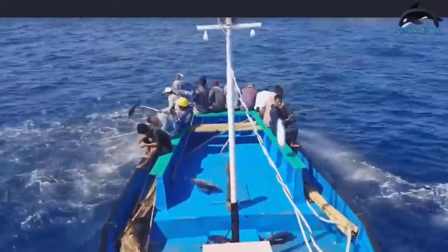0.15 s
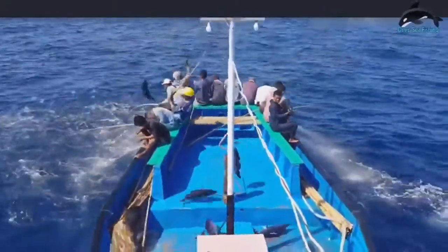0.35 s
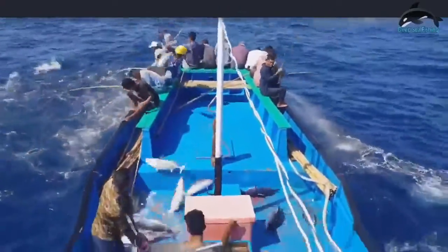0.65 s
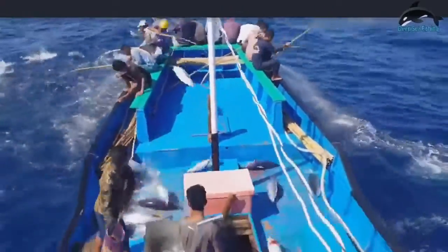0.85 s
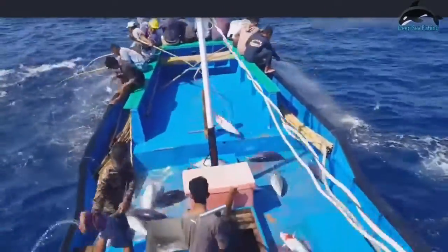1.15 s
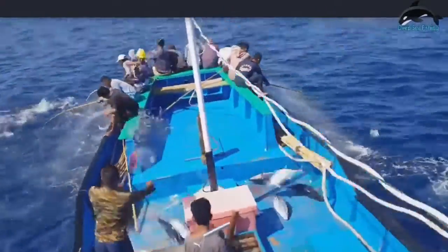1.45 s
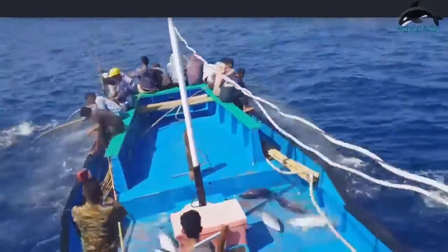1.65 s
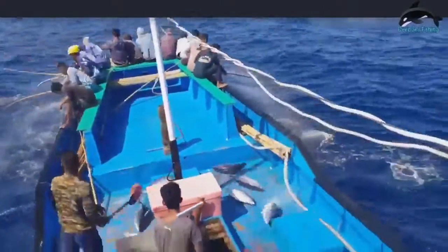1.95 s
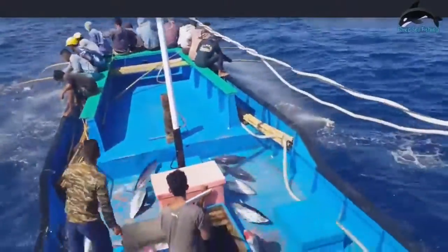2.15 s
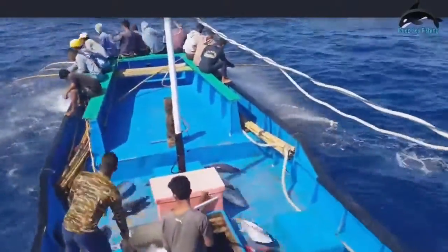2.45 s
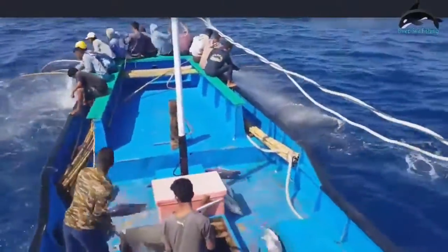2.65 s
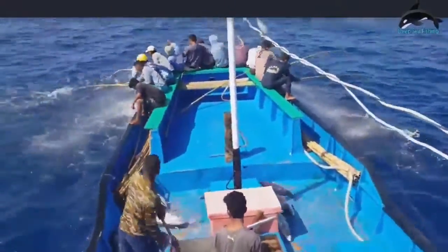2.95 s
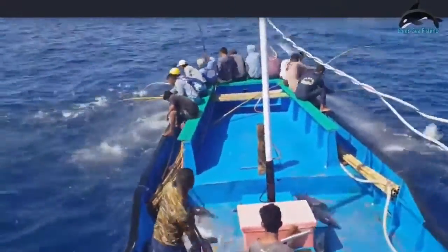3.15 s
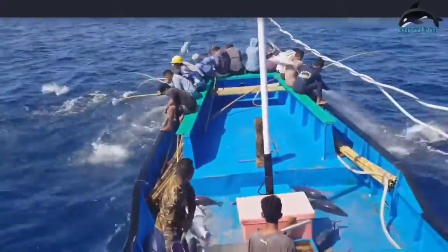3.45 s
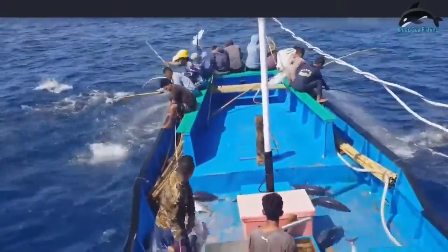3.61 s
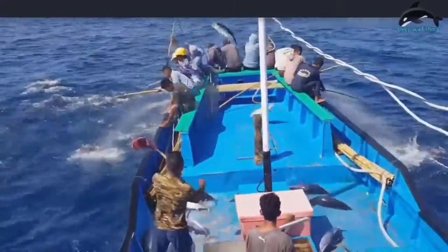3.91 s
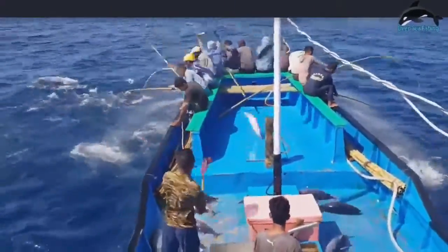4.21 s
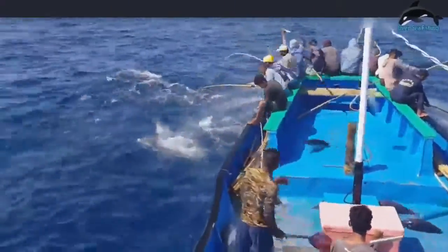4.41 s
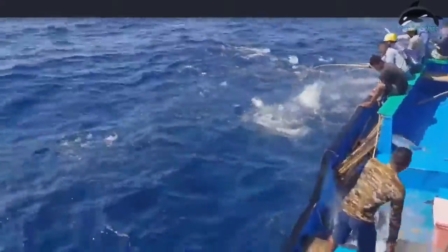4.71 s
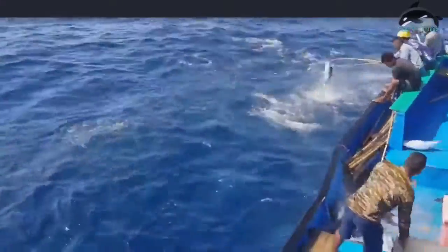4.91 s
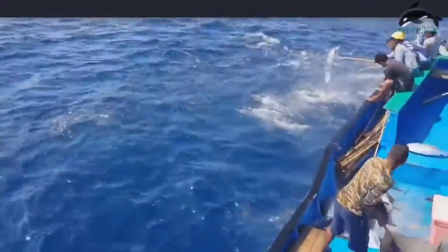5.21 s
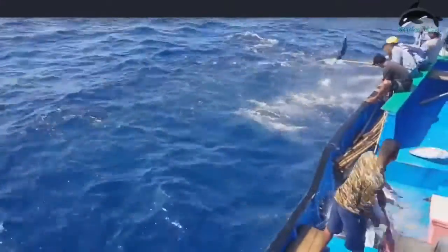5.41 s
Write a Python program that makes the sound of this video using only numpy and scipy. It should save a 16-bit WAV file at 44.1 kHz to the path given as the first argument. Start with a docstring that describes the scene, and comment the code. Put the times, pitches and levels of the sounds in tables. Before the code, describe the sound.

Continuous bright spray surrounds a fishing boat on open water. Fine mist hisses while drops patter, fizz and tick, and irregular slugs of water land as short, sizzling splashes. The first 1.2 seconds are especially busy, with strong splashes and hollow, upward-bending plops of trapped air. A fish hits the deck with a wet slap and short panel knock near 1.4 seconds. From about 1.5 to 2.4 the splashes are generally softer and more smeared, with a light thud near 2. They gather again around 2.8; a prominent plop comes at 3.1 and a sharp splash at 3.3. Between 3.75 and 4.7 several dull fish thumps cluster among more plops. Crisp splashes continue past 5 seconds, with light thuds near 5.05 and 5.4. Quiet foaming, gurgling and a faint rumble swell at the hull. The small microphone sounds close, dry, piercing in the treble and limited on peaks.

```python
"""Spray jets along a fishing boat

On the open sea, jets along the hull throw water that breaks into slugs: noise showers landing as sizzling
splashes, over filtered noise for mist, sparse noisy drops for patter, and swarms of gliding tones for fizz.
At the hull, low noise churns and rumbles and trapped air plops as ringing tones; on deck, landed fish thump
as panel modes with noise slaps and booms. A small microphone rings near 6 kHz and limits the peaks."""
import sys
import numpy as np
from scipy import signal
from scipy.fft import rfft, irfft, next_fast_len
from scipy.io import wavfile
from scipy.ndimage import uniform_filter1d, minimum_filter1d

SR = 44100
rng = np.random.default_rng(int(sys.argv[2]) if len(sys.argv) > 2 else 0)


def inscribe(sig):
    """Save sig as 16-bit PCM at rate SR to the path in sys.argv[1].

    A 1-D sig is mono; a 2-D sig holds one channel per row.
    Samples are clipped to [-1, 1] before scaling.
    """
    pcm = np.round(np.clip(np.atleast_2d(sig).T, -1, 1) * 32767)
    wavfile.write(sys.argv[1], SR, pcm.astype(np.int16))


N = 245637
TIME = np.arange(N) / SR


def undb(db):
    """Decibels to amplitude gain."""
    return 10 ** (np.asarray(db) / 20)


def unit(x):
    """Scale to rms 1."""
    return x / np.sqrt(np.mean(x ** 2) + 1e-18)


def add(out, s, x):
    """Mix x into out from time s, dropping what falls outside."""
    i = int(s * SR)
    x = x[max(-i, 0):max(N - i, 0)]
    start = max(i, 0)
    out[start:start + len(x)] += x


def colour(x, points, size=4096):
    """Causal minimum-phase filter with the given spectrum; white noise keeps its level."""
    hz, db = np.transpose(points)
    bin_hz = np.arange(size // 2 + 1) * SR / size
    gain = undb(np.interp(np.log(bin_hz + 1), np.log(hz), db))
    # folding the cepstrum onto positive time makes the filter minimum-phase
    cepstrum = irfft(np.log(gain))
    cepstrum[1:size // 2] *= 2
    cepstrum[size // 2 + 1:] = 0
    response = irfft(np.exp(rfft(cepstrum)))
    return signal.fftconvolve(x, response / np.linalg.norm(response))[:len(x)]


def resonate(x, hz, width_hz):
    """One resonance, gain 1 at its centre."""
    return signal.lfilter(*signal.iirpeak(hz, hz / width_hz, fs=SR), x)


def walk(rate_hz):
    """Random levels held 1 / rate_hz s and smoothed twice, rms 1."""
    k = max(int(SR / rate_hz), 2)
    held = np.repeat(rng.standard_normal(N // k + 1), k)[:N]
    return unit(uniform_filter1d(uniform_filter1d(held, k), k))


def flicker(x, rate_hz, depth_db):
    """Each octave wavers on its own, as drops and bubbles of changing size take over."""
    size = next_fast_len(N, True)
    spectrum = rfft(x, size)
    bins = len(spectrum)
    octave = np.clip(np.log2(np.arange(1, bins + 1) / bins) + 9, 0, 9)
    out = np.zeros(N)
    for k in range(10):
        share = np.maximum(1 - np.abs(octave - k), 0)  # overlapping triangles that sum to 1
        band = irfft(spectrum * share, size)[:N]
        out += band * undb(depth_db * walk(rate_hz))
    return out


def burst(rise_s, t60_s):
    """Envelope with a quick rise and an exponential fall."""
    t = np.arange(int((rise_s + t60_s) * SR) + 2) / SR
    return np.minimum(t / rise_s, 1) * np.exp(-np.log(1000) * t / t60_s)


def bubble(hz, rise_s, t60_s, glide):
    """A decaying ring; with glide its pitch rises, as a pocket of air does nearing the surface."""
    fade = burst(rise_s, t60_s)
    pitch = hz * (1 + glide * np.linspace(0, 1, len(fade)))
    return fade * np.sin(2 * np.pi * np.cumsum(pitch) / SR)


def puff(points, rise_s, t60_s):
    """A short coloured burst of noise, scaled to about rms 1 at its crest."""
    fade = burst(rise_s, t60_s)
    blow = colour(rng.standard_normal(len(fade)) * fade, points)
    return blow * np.linalg.norm(fade) / np.linalg.norm(blow)


def drops(per_s, spread_db):
    """Clicks of countless drops of unequal size, rms 1."""
    lands = rng.random(N) < per_s / SR
    return unit(lands * rng.standard_normal(N) * undb(spread_db * rng.standard_normal(N)))


# flow of the jets along the boat: (time [s], level against the usual flow [dB])
JET_FLOW = [(0, 0), (.2, -.5), (.36, -1.5), (.5, 0.5), (1.3, 0), (2.1, -1), (2.75, 0), (3.3, 0.03),
            (4, -0.18), (4.6, 1), (5.57, 0)]


def jet_flow():
    """Gain of the spray as the jets strengthen and slacken."""
    return undb(np.interp(TIME, *np.transpose(JET_FLOW)))


# spectrum of mist and fine drops in the air: (frequency [Hz], relative level per Hz [dB])
MIST_SPECTRUM = [(60, -52), (500, -20.5), (1200, -17.5), (2300, -15.5), (3500, -9), (4600, -7),
                 (6000, -3.5), (7200, -6.5), (8500, -12), (10500, -17.5), (15000, -31)]


def mist(flutter_db):
    """The finest droplets merge into a hiss whose level flutters."""
    return unit(colour(rng.standard_normal(N), MIST_SPECTRUM) * undb(flutter_db * walk(45)))


def patter(per_s, spread_db, t60_s):
    """Big stray drops: each cracks on the surface and fizzes for a few milliseconds."""
    scatter = np.clip(rng.standard_normal(N), -2, 2)
    sizes = (rng.random(N) < per_s / SR) * undb(spread_db * scatter)
    power = np.abs(signal.fftconvolve(sizes ** 2, burst(1 / SR, t60_s) ** 2)[:N])
    return unit(colour(np.sqrt(power) * drops(per_s=20000, spread_db=1.0), MIST_SPECTRUM))


def bubbles(low_hz, high_hz, cycles, glide, spread_db, count):
    """A swarm of ringing bubbles, many faint and a few loud; each fades over a set count of cycles."""
    out = np.zeros(N)
    for when, bore, size in rng.random((count, 3)):
        hz = low_hz * (high_hz / low_hz) ** bore
        ring = bubble(hz, .5 / hz, cycles / hz, glide)
        add(out, when * N / SR, undb(spread_db * size ** 3) * ring)
    return unit(out)


# spectrum of a drop striking the boat: (frequency [Hz], relative level per Hz [dB])
TICK_SPECTRUM = [(300, -24), (1500, -11.5), (4000, -4), (6000, -1), (9000, -3.5), (15000, -15)]


def ticks(per_s, spread_db):
    """Single drops strike the boat nearby with a dry tick, a lone click coloured by the spectrum."""
    sizes = (rng.random(N) < per_s / SR) * undb(spread_db * rng.uniform(-1, 1, N))
    return unit(colour(sizes * rng.choice([-1, 1], N), TICK_SPECTRUM))


# wash along the hull, rising and falling with the waves: (time [s], level of the foam [dB])
WASH_LEVEL = [(0, -30), (.8, -29.5), (1.04, -26.5), (1.2, -29.5), (2, -29.5), (2.9, -28.5), (3.4, -29.5),
              (3.75, -28), (4.15, -31.5), (4.35, -28.5), (4.7, -32.5), (4.95, -29), (5.57, -30.5)]


def hull_wash():
    """Gain of the sea along the hull as the waves rise and fall."""
    return undb(np.interp(TIME, *np.transpose(WASH_LEVEL)))


# spectrum of foaming water at the hull: (frequency [Hz], relative level per Hz [dB])
CHURN_SPECTRUM = [(25, -46), (55, -39.5), (90, -18), (160, -9.5), (220, -4), (290, -0.5), (400, -2.5),
                  (600, -5.5), (900, -8.5), (1500, -11.5), (2500, -13), (5000, -27.5)]


def churn(surge_hz, depth_db):
    """Foaming water along the hull: a low rush that seethes from one pitch range to another."""
    return unit(flicker(colour(rng.standard_normal(N), CHURN_SPECTRUM), surge_hz, depth_db))


# spectrum of the nudged hull: (frequency [Hz], relative level per Hz [dB])
RUMBLE_SPECTRUM = [(20, -17.5), (50, -10), (80, 0.5), (110, 0.5), (220, -13.5), (500, -42)]


def rumble(surge_hz, depth_db):
    """Waves nudge the hull: a low rumble that comes and goes."""
    return unit(colour(rng.standard_normal(N), RUMBLE_SPECTRUM) * undb(depth_db * walk(surge_hz)))


# small slugs: level of the fastest landing, scatter either way, range of landing times;
# slower ones are softer
SMALL_DB, SMALL_SPREAD_DB, SMALL_DB_PER_DOUBLING = -15, 2, -2.15
SMALL_SHORT_S, SMALL_LONG_S = 0.00313, 0.039


def small_slugs(count):
    """The jets shed small slugs all the time, at uneven intervals: rows like those of BIG_SLUGS."""
    when, slow, size = rng.random((count, 3)).T
    start_s = (np.arange(count) + when) / count * N / SR
    landing_s = SMALL_SHORT_S * (SMALL_LONG_S / SMALL_SHORT_S) ** slow
    scatter_db = SMALL_SPREAD_DB * (2 * size - 1)
    slowness_db = SMALL_DB_PER_DOUBLING * np.log2(landing_s / SMALL_SHORT_S)
    return np.column_stack([start_s, SMALL_DB + scatter_db + slowness_db, landing_s])


# big slugs of water landing on the sea: (time [s], relative level [dB], landing time [s])
BIG_SLUGS = [(0.003, -13, 0.019), (0.055, -8.5, 0.0194), (0.166, -6.5, 0.0126), (0.202, -16.5, 0.0128),
             (0.231, -14, 0.012), (0.28, -16, 0.0236), (0.414, -12, .022), (0.487, -10.5, 0.0072),
             (0.625, -13.5, .014), (0.657, -18.5, 0.038), (0.687, -7, 0.0076), (0.806, -8.5, 0.0133),
             (0.873, -11, 0.0171), (0.926, -16, 0.0295), (1.064, -11.5, 0.008), (1.125, -9.5, 0.0046),
             (1.187, -13, 0.0046), (1.291, -17.5, 0.0257), (1.341, -18.5, 0.0305), (1.522, -17, 0.0417),
             (1.604, -20.5, 0.0143), (1.657, -19.5, 0.055), (1.743, -13.5, 0.0031), (1.788, -24.5, .003),
             (1.818, -17, 0.034), (1.881, -12, .011), (1.944, -14, 0.0154), (2.025, -16.5, .035),
             (2.101, -13.5, .003), (2.145, -16.5, 0.0156), (2.21, -19, 0.039), (2.259, -19.5, 0.058),
             (2.343, -17.5, 0.0215), (2.425, -14, 0.0153), (2.457, -10.5, 0.0094), (2.501, -16.5, 0.0327),
             (2.718, -15, 0.0153), (2.791, -14.5, 0.0114), (2.817, -13, .012), (2.849, -10, 0.0129),
             (2.884, -12.5, 0.0134), (2.929, -17, .012), (3.07, -13.5, 0.0172), (3.227, -17.5, 0.0274),
             (3.276, -13, 0.0027), (3.303, -6, 0.0122), (3.348, -11.5, 0.0049), (3.439, -16.5, 0.051),
             (3.504, -19.5, 0.0257), (3.534, -9.5, 0.0079), (3.644, -12.5, 0.0103), (3.781, -17, 0.0128),
             (3.802, -14, 0.0163), (3.908, -16.5, .005), (3.952, -15.5, 0.0029), (4.005, -17.5, 0.047),
             (4.156, -12.5, 0.0204), (4.217, -19.5, 0.042), (4.336, -13.5, 0.0242), (4.441, -18, 0.029),
             (4.547, -16, 0.0124), (4.571, -12, 0.0197), (4.692, -17.5, 0.0142), (4.727, -13, 0.0375),
             (4.852, -10.5, 0.0122), (4.915, -17.5, 0.029), (5.092, -10, 0.0114), (5.202, -9.5, 0.0093),
             (5.249, -8.5, 0.0173), (5.375, -14, 0.0049), (5.5, -11.5, 0.0054)]
# spectrum of a splash: (frequency [Hz], relative level per Hz [dB])
SPLASH_SPECTRUM = [(40, -49), (150, -20.5), (400, -12.5), (1000, -10), (2300, -12.5), (3500, -7.5),
                   (4600, -2.5), (6000, 0.5), (7200, -2), (8500, -9), (10500, -14.5), (15000, -22.5)]
# the hard head of a slug; thrown-up drops falling back, level against the shower
FRONT_S, TRAIL_S, TRAIL_DB = 0.0028, 0.0524, -15


def splashes(slugs, db, rise_s, front_db, ragged_db, echo, ping_db, ping_s, size=32):
    """Each slug hits with a hard front, lands as a shower and trails falling drops; it pings one small
    bubble, and a reflection from the hull gives every splash its own colour."""
    out, t = np.zeros(N), TIME[:SR // 7]

    def fall(length_s):
        return np.exp(-(t / length_s) ** 2 / 2 - t / (2 * length_s))

    for (s, slug_db, landing_s), (place, bore) in zip(slugs, rng.random((len(slugs), 2))):
        stages = [undb(front_db) * fall(FRONT_S), fall(landing_s), undb(TRAIL_DB) * fall(TRAIL_S)]
        fade = np.minimum(t / rise_s, 1) * np.linalg.norm(stages, axis=0)
        lumps = np.repeat(rng.standard_normal(len(t) // size + 1), size)[:len(t)]  # drops of unequal size
        noise = unit(rng.standard_normal(len(t)) * undb(ragged_db * lumps))
        shower = undb(slug_db) * fade * noise
        add(out, s, shower)
        add(out, s + .0003 + .001 * place, echo * shower)
        ping = bubble(5000 + 1800 * bore, rise_s, ping_s, 0.053)
        add(out, s, undb(slug_db + ping_db) * ping)
    return undb(db) * colour(out, SPLASH_SPECTRUM)


# heavy splashes that trap a pocket of air:
# (time [s], relative plop level [dB], relative wet slap level [dB], starting plop pitch [Hz])
AIR_PLOPS = [(0.004, -14.5, -18, 469), (0.168, -17, -20, 359.8), (0.415, -17.5, -19.5, 465),
             (0.488, -18.5, -21.5, 505), (0.571, -16, -24.5, 527), (0.648, -12, -30.5, 532),
             (0.818, -10, -28, 359.8), (0.877, -10.5, -20, 378.8), (0.929, -16, -31, 328.8),
             (0.99, -14, -22.5, 583.3), (1.145, -10.5, -23.5, 458.3), (1.666, -12.5, -21, 537.2),
             (1.799, -15, -32, 608.5), (3.071, -6, -15, 409.7), (3.804, -12.5, -20.5, 725.6),
             (3.845, -10, -31, 491.8), (3.949, -19.5, -38, 504.5), (4.014, -16.5, -20, 833),
             (4.157, -15, -18, 1411), (4.409, -16, -21, 480.7), (4.919, -17, -18, 561.6),
             (5.249, -17.5, -19, 331.3)]
# spectrum of a wet slap, on water or on deck: (frequency [Hz], relative level per Hz [dB])
SLAP_SPECTRUM = [(200, -15.5), (450, 1), (850, 1.5), (1500, 0), (2500, -4.5), (4000, -3), (8000, -27.5)]


def plops(plop_db, slap_db, rise_s, t60_s, glide):
    """The surface is smacked open, then the trapped air rings, with a second pocket beside it."""
    out = np.zeros(N)
    for (s, air_db, wet_db, hz), ratio in zip(AIR_PLOPS, rng.uniform(.9, 2.3, len(AIR_PLOPS))):
        smack_db, ring_db = wet_db + slap_db, air_db + plop_db
        add(out, s, undb(smack_db) * puff(SLAP_SPECTRUM, rise_s=0.00059, t60_s=0.1275))
        # first crack of contact
        add(out, s, undb(smack_db - 4.5) * puff(SLAP_SPECTRUM, rise_s=.0003, t60_s=0.041))
        add(out, s, undb(ring_db) * bubble(hz, rise_s, t60_s, glide))
        add(out, s + .008, undb(ring_db - 3.5) * bubble(hz * ratio, rise_s, t60_s, glide))
    return out


# fish landing on the deck:
# (time [s], relative panel ring [dB], relative hull boom [dB], relative wet slap [dB])
FISH_LANDINGS = [(1.356, -11, -51, -19.5), (1.41, -23, -47, -28.5), (1.96, -28, -40.5, -21.5),
                 (3.154, -21, -49, -25.5), (3.75, -22, -61.5, -24.5), (3.845, -12.5, -62, -26),
                 (3.936, -21, -54, -29), (4.001, -20.5, -47, -23), (4.038, -27, -39, -28),
                 (4.405, -23.5, -38, -24), (4.456, -15.5, -33.5, -40), (4.679, -25.5, -54.5, -22),
                 (5.047, -20.5, -59, -36), (5.372, -20, -41.5, -20)]
# modes of the deck panels: (nominal frequency [Hz], relative level [dB], t60 [s])
DECK_MODES = [(135, -11, 0.094), (173, -8, 0.081), (219.7, -5, 0.208), (288.9, 6.5, 0.0876),
              (325, -6.5, 0.046), (369.5, -7, 0.151), (500, -37, 0.068)]
# spectrum of the hull boom: (frequency [Hz], relative level per Hz [dB])
BOOM_SPECTRUM = [(25, -29), (55, -8), (85, 1), (140, 5), (220, -15.5), (500, -40)]


def thumps(ring_db, boom_db, slap_db, soft_s, scatter_db):
    """A soft wet body lands: the skin slaps, the deck panels ring and the hull booms."""
    out = np.zeros(N)
    for s, panel_db, hull_db, wet_db in FISH_LANDINGS:
        for hz, mode_db, t60_s in DECK_MODES:
            spot, load = rng.standard_normal(2)  # each landing place favours other modes
            ring = bubble(hz * (1 + 0.0068 * load), soft_s, t60_s, 0) * rng.choice([-1, 1])
            add(out, s, undb(panel_db + ring_db + mode_db + scatter_db * spot) * ring)
        add(out, s, undb(hull_db + boom_db) * puff(BOOM_SPECTRUM, rise_s=0.0107, t60_s=0.283))
        add(out, s, undb(wet_db + slap_db) * puff(SLAP_SPECTRUM, rise_s=0.00183, t60_s=0.129))
    return out


def scene():
    """Spray and sea around the boat, with the catch landing on deck."""
    hiss = undb(-5.5) * mist(flutter_db=0.4)
    stray = undb(-7.5) * patter(per_s=300, spread_db=3.5, t60_s=0.0139)
    fizz = undb(-11) * bubbles(
        low_hz=4160, high_hz=8450, cycles=53.5, glide=0.044, spread_db=15, count=2000)
    tapping = undb(-16.5) * ticks(per_s=60, spread_db=4.5)
    fine = undb(-22) * (hiss + stray + fizz + tapping)

    foam = churn(surge_hz=36, depth_db=2.2)
    gurgle = undb(-5.5) * bubbles(
        low_hz=260.0, high_hz=1719, cycles=20.2, glide=0.128, spread_db=14.5, count=1100)
    sea = hull_wash() * (foam + gurgle + undb(-22) * rumble(surge_hz=12, depth_db=4.5))

    small = splashes(small_slugs(count=55), db=-4, rise_s=0.00296, front_db=-12, ragged_db=3.5,
                     echo=0.52, ping_db=-8, ping_s=0.0203)
    big = splashes(BIG_SLUGS, db=-3.0, rise_s=0.00063, front_db=-7, ragged_db=2.0,
                   echo=0.59, ping_db=-9.5, ping_s=0.0244)
    spray = flicker(jet_flow() * (fine + small) + big, rate_hz=140, depth_db=1.13)

    heavy = plops(plop_db=-3.5, slap_db=1, rise_s=0.00242, t60_s=0.0842, glide=0.149)
    deck = thumps(ring_db=-2.0, boom_db=7, slap_db=0.5, soft_s=0.0077, scatter_db=3.01)
    return (spray + sea + deck + heavy)[None]


# small microphone: port resonance and the gain of its added ring
MIC_HZ, MIC_WIDTH_HZ, MIC_LIFT = 5922, 1370, 0.789
CEILING, TOP_HZ = .53, 15300  # limiter threshold ahead of the top cut; edge of the top cut


def record(dry):
    """The microphone port rings; a fast limiter holds the peaks; the top is cut."""
    x = dry + MIC_LIFT * resonate(dry, MIC_HZ, MIC_WIDTH_HZ)
    gain = np.minimum(1, CEILING / (np.abs(x) + 1e-9))
    gain = uniform_filter1d(minimum_filter1d(gain, size=45), size=45)  # about 1 ms, centred
    top_cut = signal.ellip(10, .2, 80, TOP_HZ, fs=SR, output="sos")
    return signal.sosfilt(top_cut, x * gain)


dry = scene()
out = record(dry)
inscribe(out)
```